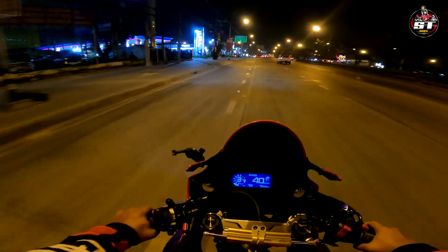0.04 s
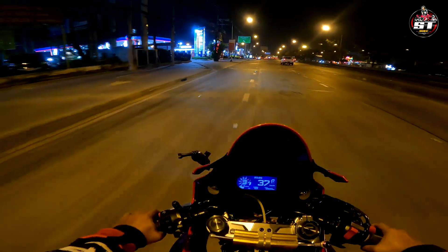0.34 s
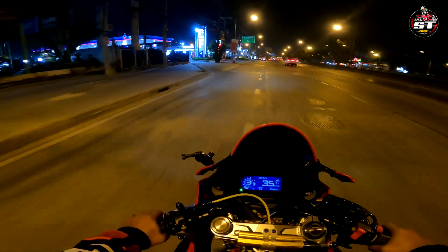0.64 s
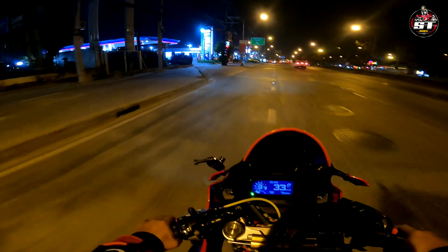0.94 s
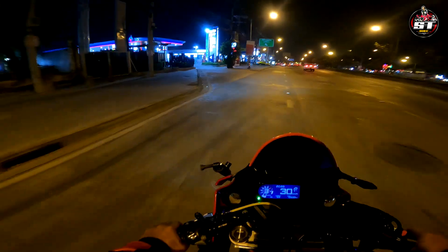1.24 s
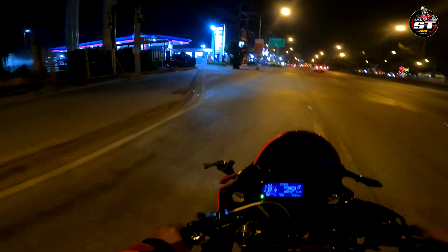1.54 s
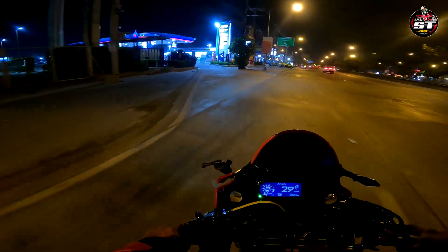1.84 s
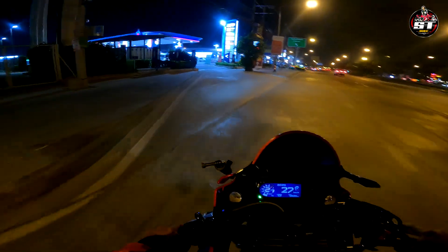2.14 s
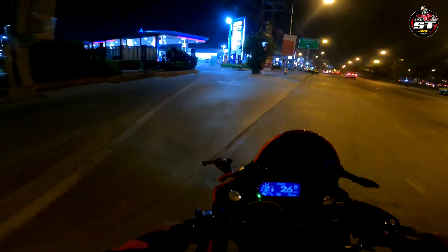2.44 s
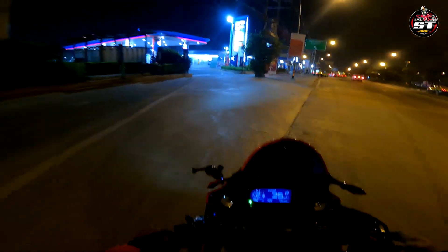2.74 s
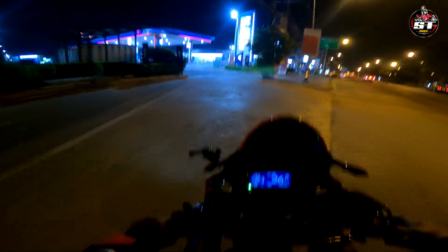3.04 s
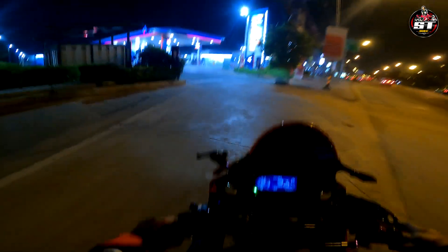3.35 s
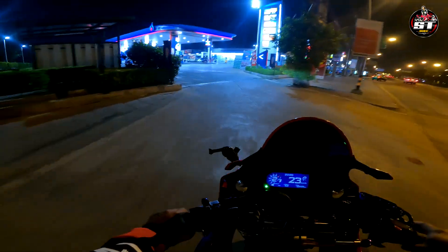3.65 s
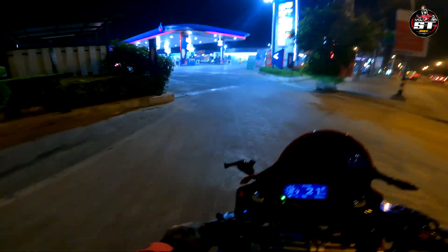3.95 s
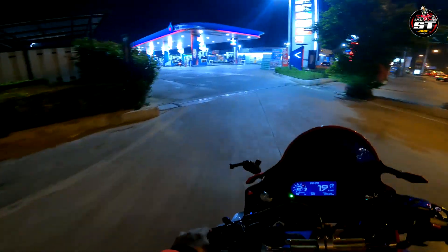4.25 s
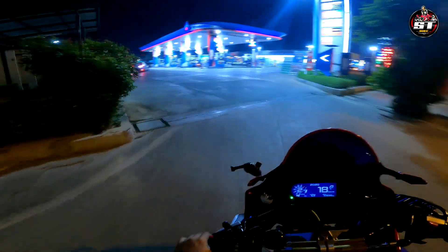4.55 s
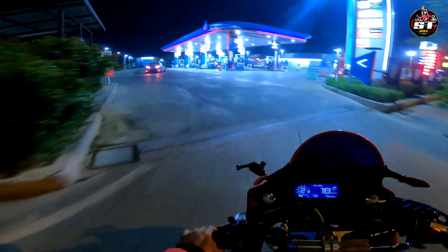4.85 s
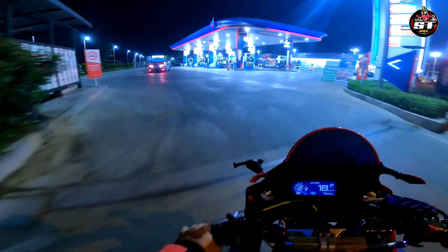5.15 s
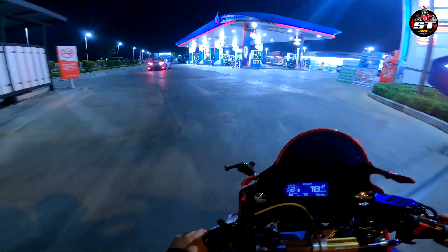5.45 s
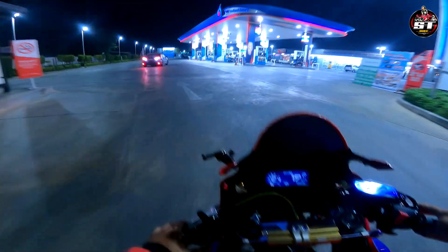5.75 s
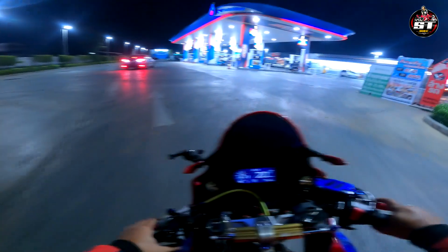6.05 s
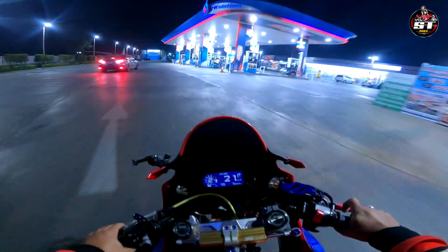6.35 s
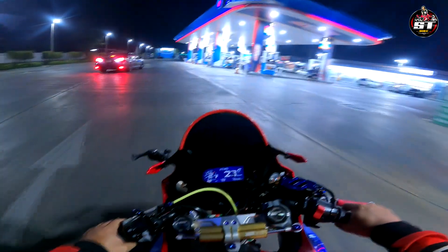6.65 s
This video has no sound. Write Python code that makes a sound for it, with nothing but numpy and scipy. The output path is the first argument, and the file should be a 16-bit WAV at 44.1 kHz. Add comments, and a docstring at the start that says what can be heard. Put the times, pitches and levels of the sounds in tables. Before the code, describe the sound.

Heard from the seat, a motorcycle coasts at low revs, downshifts, revs once briefly, idles and then rides smoothly on, with light wind buffeting.

```python
"""A night road, heard from the seat of a four-cylinder motorcycle that slows at low revs.
The exhaust burbles on a shut throttle, is blipped, sinks to idle and then pulls smoothly away.
Periodic firing gives harmonics that swell and fade as the revs carry them through the pipe's resonances;
uneven combustion gives the burble. Valve gear rustles, gears whine, tyres roll and air buffets and hisses.
A loose part buzzes, the brakes sing faintly, the downshift knocks, a sleeve swishes and something ticks."""
import sys
import numpy as np
from scipy import signal
from scipy.fft import rfft, irfft, next_fast_len
from scipy.io import wavfile
from scipy.ndimage import uniform_filter1d, map_coordinates

SR = 44100
rng = np.random.default_rng(int(sys.argv[2]) if len(sys.argv) > 2 else 0)


def generate_wav(sig):
    """Save sig (samples, or channels by samples) to the path in sys.argv[1] as 16-bit PCM at SR."""
    pcm = np.round(np.clip(np.atleast_2d(sig).T, -1, 1) * 32767).astype(np.int16)
    wavfile.write(sys.argv[1], SR, pcm)


N = 303849
TIME = np.arange(N) / SR
SILENCER_HZ = 450
CRUISE_KMH, CRUISE_HZ = 24, 60   # reference road speed and firing rate for the noise levels

# Modes of the gas in the exhaust pipe. Each row: frequency in Hz, bandwidth in Hz, gain in dB.
PIPE_MODES = [(62.7, 17.6, 3), (129.8, 11.2, -1), (154.6, 22.3, -0.5), (236.9, 21, -5.5),
              (273.3, 19.5, -4.5), (382.3, 39.7, -12.5), (420.4, 21.5, -11)]


def from_db(db):
    """Amplitude ratio: tenfold for every 20 dB."""
    return 10 ** (np.asarray(db) / 20)


def unit_rms(x):
    """Normalisation to a mean power of 1."""
    return x / np.sqrt(np.mean(x ** 2) + 1e-20)


def levelled(x, span_s):
    """Division by the running rms evens out changes slower than the span."""
    return x / np.sqrt(np.abs(uniform_filter1d(x ** 2, max(int(span_s * SR), 2))) + 1e-14)


def curves(rows):
    """Linear interpolation of each column over the times in the first."""
    times, *columns = np.transpose(rows)
    return [np.interp(TIME, times, column) for column in columns]


def butterworth(x, hz, kind, order=2):
    """A maximally flat filter, falling 6 dB per octave for each order."""
    return signal.sosfilt(signal.butter(order, hz, kind, fs=SR, output="sos"), x + 1e-18)


def drift(rate_hz):
    """Slow random modulation of rms 1: a spline through Gaussian values."""
    knots = rng.standard_normal(1400)
    smooth = map_coordinates(knots, [TIME[::50] * rate_hz + 5], order=3, mode="wrap")
    return unit_rms(smooth).repeat(50)[:N]


def noise(spectrum):
    """White noise shaped by (Hz, dB) points, rolling off beyond them; rms 1."""
    hz, db = np.transpose(spectrum)
    size = next_fast_len(N)
    log_hz = np.log(np.arange(size // 2 + 1) * SR / size + 1)
    outside = np.abs(log_hz - np.clip(log_hz, np.log(hz[0]), np.log(hz[-1])))
    gain = from_db(np.interp(log_hz, np.log(hz), db) - 13 * outside)
    return unit_rms(irfft(rfft(rng.standard_normal(size)) * gain, size)[:N])


def flutter(cycles, width_hz):
    """Random modulation of amplitude and phase spreads a tone over a narrow band; rms 1."""
    in_phase, quadrature = butterworth(rng.standard_normal((2, N)), width_hz / 2, "low")
    return unit_rms(in_phase * np.cos(2 * np.pi * cycles) + quadrature * np.sin(2 * np.pi * cycles))


def resonate(x, modes):
    """Modal superposition: damped resonators in parallel, alternating in sign."""
    out = 0
    for k, (hz, width_hz, db) in enumerate(modes):
        radius = np.exp(-np.pi * width_hz / SR)
        poles = [1, -2 * radius * np.cos(2 * np.pi * hz / SR), radius ** 2]
        mode = (1 - radius ** 2) / 2 * signal.lfilter([1, 0, -1], poles, x + 1e-18)
        out = out + (-1) ** k * from_db(db) * mode
    return out


def decay(start, t60):
    """Exponential damping from a sudden onset: 60 dB in t60 seconds."""
    return (TIME >= start) * from_db(-60 * np.maximum(TIME - start, 0) / t60)


def swell(centre_s, width_s):
    """A Gaussian envelope of height 1."""
    return np.exp(-.5 * ((TIME - centre_s) / width_s) ** 2)


def arch(start, end):
    """A rounded envelope between two times: the root of a half sine."""
    return np.sqrt(np.abs(np.sin(np.pi * np.clip((TIME - start) / (end - start), 0, 1))))


def throttle():
    """A blip raises revs, load and bark and smooths combustion; the revs sag after the throttle shuts."""
    # Engine speed between blips. Each row: time in seconds, firing rate in Hz.
    engine_speed = [(0, 93.5), (.6, 84), (1.35, 72.7), (1.6, 60.9), (1.72, 52), (2.03, 79.5), (2.45, 78.5),
                    (2.6, 68), (3.04, 57.6), (3.21, 41.2), (3.6, 43.4), (3.82, 42), (4.1, 56.2),
                    (5.25, 55.6), (5.6, 57.2), (5.88, 62.4), (6.05, 62.2), (6.33, 65), (6.89, 74.6)]
    # Combustion. Each row: time in seconds, load, roughness (both limited to 0-1 below).
    combustion = [(0, 0, 1.05), (1.55, 0.06, 0.78), (2.3, 0.12, 0.99), (3.1, 0.2, 0.94), (3.25, 0.92, 0.95),
                  (3.85, 0.73, 0.96), (4.2, 0.2, 0.75), (4.45, 0.72, 0.6), (5.55, 0.74, 0.41),
                  (5.8, 0.84, 0.52), (6.45, 1, 0.3), (6.89, 0.58, 0.38)]
    # Throttle blips. Each row: start in seconds, firing rate gained in Hz, bark gained in dB.
    blips = [(2.594, 27, 10.5), (4.672, 7, .5)]
    rise_s, close_s, sag_hz_per_s = .09, .034, 105
    firing_hz, = curves(engine_speed)
    load, roughness = curves(combustion)
    blip_db = 0
    for start, gained_hz, bark_db in blips:
        top = start + rise_s
        settled = top + gained_hz / sag_hz_per_s
        opening = np.interp(TIME, [start, top, top + close_s], [0, 1, 0])
        firing_hz = firing_hz + np.interp(TIME, [start, top, settled], [0, gained_hz, 0])
        load = load + 0.41 * opening
        roughness = roughness * (1 - 0.15 * opening)
        blip_db = blip_db + bark_db * np.sqrt(opening)
    return firing_hz, np.clip(load, 0, 1), np.clip(roughness, 0, 1), blip_db


def pipe_response(hz):
    """The pipe's complex gain for a steady tone is the sum of its modal responses."""
    return sum((-1) ** k * from_db(db) / (1 + 1j * (hz ** 2 - centre ** 2) / (hz * width))
               for k, (centre, width, db) in enumerate(PIPE_MODES))


def steady_firing(cycles, firing_hz, load):
    """Periodic firing gives a harmonic series: four partials boom, the pipe colours seven above them."""
    # Strength of a low harmonic. Each row: frequency in Hz, coasting level in dB, pulling level in dB.
    boom_spectrum = [(41, -21.5, -30.5), (50, -14, -24.5), (58.4, -16, -9.5), (59, -12.5, -13),
                     (78.3, -17, -18), (80.7, -19, -21.5), (101, -17, -24.5), (108, -24, -35.5),
                     (105, -19.5, -23.5), (121.6, -38, -23), (132.5, -24.5, -18.5), (159, -22, -10),
                     (164.2, -19.5, -24), (181.3, -27, -32), (215, -43, -21.5), (264, -35, -27),
                     (292, -35, -20.5)]
    # Emphasis at idle. Each entry: lift in dB, for harmonics 1 to 4.
    idle_lift_db = [0.5, 0.5, 1, 6]
    idle_hz, idle_span_hz = 43.4, 9.8
    drone_harmonic, drone_hz, drone_width_hz = 10, 500, 50   # a resonance that sounds past the silencer
    boom_hz, *boom_levels = np.transpose(boom_spectrum)
    idling = np.clip(1 - (firing_hz - idle_hz) / idle_span_hz, 0, 1)
    boom, overtones = 0, 0
    for k in range(1, 12):
        hz = k * firing_hz[::64]
        muffled = pipe_response(hz) / np.sqrt(1 + (hz / SILENCER_HZ) ** 40)
        drone = (k == drone_harmonic) * from_db(-20) / (1 + (2 * (hz - drone_hz) / drone_width_hz) ** 2)
        response = (muffled + drone).repeat(64)[:N]
        tone = np.sqrt(2) * np.cos(2 * np.pi * k * cycles + np.angle(response))
        if k <= len(idle_lift_db):
            coast_db, pull_db = (np.interp(k * firing_hz, boom_hz, db) for db in boom_levels)
            level_db = coast_db + load * (pull_db - coast_db) + idling * idle_lift_db[k - 1]
            boom = boom + from_db(level_db) * tone
        else:
            overtones = overtones + np.abs(response) * from_db(2.6 * drift(14)) * tone
    return boom, levelled(overtones, span_s=0.22)


def uneven_firing(cycles):
    """Charges vary in strength and timing; their impulses and turbulent puffs excite the pipe's modes."""
    # Imbalance of the four cylinders. Each entry: relative departure from the mean firing strength.
    imbalance = [.5, -0.46, -0.067, 0.036]
    jitter_s = 0.00092
    firings = np.flatnonzero(np.diff(np.floor(cycles)) > 0)
    strength, lateness, pop_size = rng.standard_normal((len(firings), 3)).T
    onsets = np.clip(firings + (jitter_s * SR * lateness).astype(int), 0, N - 1)
    surplus, pops = np.zeros((2, N))
    surplus[onsets] = np.tanh(strength) + 0.85 * np.resize(imbalance, len(firings))
    pops[onsets] = from_db(5.1 * np.clip(pop_size, -2, 2))
    puffs = rng.standard_normal(N) * (1 + 0.82 * np.cos(2 * np.pi * (cycles - .1)))
    burble = resonate(unit_rms(surplus) + .25 * puffs, PIPE_MODES)
    burble = butterworth(burble, 241.4, "low", order=6)
    burble = butterworth(burble, 44, "high", order=4)
    rasp = resonate(unit_rms(pops) + 1.17 * puffs, PIPE_MODES)
    rasp = butterworth(rasp, 248, "high", order=4)
    rasp = butterworth(rasp, SILENCER_HZ, "low", order=12)
    return levelled(burble, span_s=0.11), levelled(rasp, span_s=0.11)


def exhaust(cycles, firing_hz, load, roughness, blip_db):
    """Pulsating outflow radiates a boom, a burble and a bark; rough firing turns the bark to noise."""
    boom, overtones = steady_firing(cycles, firing_hz, load)
    burble, rasp = uneven_firing(cycles)
    # The gas leaves in one gust per firing, deeper under load.
    gust = 1 + (0.22 + 0.18 * load) * np.cos(2 * np.pi * (cycles - 0.34))
    blend = np.sqrt(1 - roughness ** 2) * overtones + roughness * rasp
    bark = levelled(blend * gust, span_s=0.14)
    stumble_db = -11.5 * swell(3.14, width_s=0.041)   # the firing falters just before idle catches
    revs_db = 5.5 * np.log2(firing_hz / CRUISE_HZ)
    burble_db = -29 + revs_db + 11.2 * roughness + 0.77 * stumble_db
    bark_db = -29.5 + revs_db + 1.6 * load + blip_db
    return from_db(0.26 + stumble_db) * boom + from_db(burble_db) * burble + from_db(bark_db) * bark


def running_gain(firing_hz, cruise_db, speed_db, revs_db, brake_db):
    """Power laws add speed_db and revs_db per doubling of road speed and revs; braking adds brake_db."""
    # Road speed. Each row: time in seconds, speed in km/h.
    road_speed = [(0, 35), (1.1, 37.5), (2.5, 29.6), (3.5, 17.6), (4.5, 17.7), (5.6, 24), (6.89, 23.3)]
    brake_on_s, brake_off_s, squeeze_s = 1.23, 3.2, 0.65
    kmh, = curves(road_speed)
    braking = np.clip(np.minimum(TIME - brake_on_s, brake_off_s - TIME) / squeeze_s, 0, 1)
    motion_db = speed_db * np.log2(kmh / CRUISE_KMH) + revs_db * np.log2(firing_hz / CRUISE_HZ)
    return from_db(cruise_db + motion_db + brake_db * braking)


def valve_rustle(cycles):
    """Valve gear and chain make broadband noise, amplitude-modulated at the firing rate."""
    # Mechanical noise. Each row: frequency in Hz, relative spectral density in dB.
    spectrum = [(1100, -11.5), (1400, -2.5), (1700, 2), (2100, -1.5), (2550, -5), (3000, -13.5),
                (3500, -11), (4200, -12.5), (4900, -15.5), (5800, -28)]
    throb = 1 + 0.11 * np.cos(2 * np.pi * (cycles - .2))
    return unit_rms(noise(spectrum) * throb * from_db(0.99 * drift(35)))


def valve_clatter(cycles):
    """Impact excitation: valves seat twice per firing, and each burst of noise rings the casing."""
    # Modes of the engine casing. Each row: frequency in Hz, bandwidth in Hz, relative gain in dB.
    casing_modes = [(1020, 440, -6.5), (1660, 260, 1), (1778, 92, 4.5), (3365, 62, -4.5), (3615, 71, -4),
                    (4900, 250, -27.5)]
    burst_s = 0.006
    seatings = np.flatnonzero(np.diff(np.floor(2 * cycles)) > 0)
    impacts = np.zeros(N)
    impacts[seatings] = from_db(6 * np.minimum(rng.standard_normal(len(seatings)), 1.5))
    envelope = signal.lfilter([1], [1, -np.exp(-1 / (burst_s * SR))], impacts + 1e-18)
    return levelled(resonate(envelope * rng.standard_normal(N), casing_modes), span_s=0.54)


def gear_whine(cycles, load):
    """Meshing teeth sound at fixed multiples of the firing rate, with levels set by the load."""
    # Gear tones. Each row: multiple of the firing rate, bandwidth in Hz, then coasting and
    # pulling levels in dB relative to the mechanical noise.
    mesh_tones = [(10.98, 190, -13, -2.5), (21.08, 220, -6, -15), (25.3, 70, -10.5, -13),
                  (36.36, 190, -19.5, -11), (41.96, 83, -17.5, -11), (62.8, 170, -31, -11.5)]
    whine = sum(from_db(coast_db + load * (pull_db - coast_db)) * flutter(multiple * cycles, width_hz)
                for multiple, width_hz, coast_db, pull_db in mesh_tones)
    high_gear = from_db(1) * arch(0.22, 1.7) * flutter(11.3 * cycles, width_hz=180)
    return whine + high_gear   # the higher gear sings only until the downshift


def machinery(cycles, firing_hz, load):
    """Structure-borne sound of valves and gears grows with road speed, revs and braking."""
    rustle = from_db(-1) * valve_rustle(cycles)
    clatter = valve_clatter(cycles)
    mechanical_gain = running_gain(firing_hz, cruise_db=-48, speed_db=4.5, revs_db=1.5, brake_db=0.5)
    clatter_gain = running_gain(firing_hz, cruise_db=-54.5, speed_db=2.5, revs_db=2.5, brake_db=3.5)
    return mechanical_gain * (rustle + gear_whine(cycles, load)) + clatter_gain * clatter


def tyres(firing_hz):
    """Rolling contact makes a low, wavering noise that grows with road speed."""
    # Rolling noise. Each row: frequency in Hz, relative spectral density in dB.
    spectrum = [(300, 7), (500, 2), (650, -1), (820, -7.5), (1000, -6.5), (1250, -11.5), (1600, -21.5)]
    gain = running_gain(firing_hz, cruise_db=-37.5, speed_db=4, revs_db=-0.1, brake_db=1)
    return gain * from_db(1.5 * drift(25)) * noise(spectrum)


def air_hiss(firing_hz):
    """Air noise in the treble flickers under random amplitude modulation."""
    # Hiss. Each row: frequency in Hz, relative spectral density in dB.
    spectrum = [(4500, 0.5), (5500, -0.5), (6600, 1.5), (7800, -2.5), (9500, -6.5), (11000, -9.5),
                (13000, -23), (15500, -25)]
    gain = running_gain(firing_hz, cruise_db=-63, speed_db=2.5, revs_db=4, brake_db=3)
    return gain * from_db(0.83 * drift(66)) * noise(spectrum)


def air_buffet():
    """Turbulent air buffets the listener with slow fluctuations of pressure."""
    # Strength of the buffeting. Each row: time in seconds, level in dB.
    strength = [(0, -18.5), (1.5, -25.5), (2.85, -34), (3.1, -26), (3.45, -20), (3.7, -26), (5.8, -36),
                (6.5, -46.5)]
    level_db, = curves(strength)
    return from_db(level_db) * noise([(5, -4.5), (11, -7), (22, -10), (45, -17.5), (120, -31)])


def rattle():
    """A loose part vibrates in a narrow band, buzzing for a while as the machine slows."""
    buzz_hz = 1030
    return from_db(-48.5) * arch(1, 5) * flutter(buzz_hz * TIME, width_hz=190.5)


def brakes():
    """Friction-excited vibration of the pads: each faint squeak swells and fades as its pitch slides."""
    # Squeaks. Each row: start and end in seconds, first and last frequency in Hz, level in dB.
    squeaks = [(1.3, 1.72, 6500, 6700, -64), (1.72, 1.925, 4900, 4950, -60), (1.88, 2.291, 4750, 4500, -62),
               (2.1, 2.553, 6220, 6760, -69), (2.25, 2.698, 7500, 7850, -66)]
    out = 0
    for start, end, from_hz, to_hz, db in squeaks:
        hz = np.interp(TIME, [start, end], [from_hz, to_hz])
        out = out + from_db(db) * arch(start, end) * flutter(np.cumsum(hz) / SR, width_hz=220)
    return out


def knocks():
    """Impacts of the downshift and small jolts give noise bursts and set loose metal ringing freely."""
    # Impacts. Each row: start in seconds, relative level in dB, 60 dB decay time in seconds.
    impacts = [(1.494, -41, .05), (1.565, -24.5, .05), (1.570, -29, .06), (1.711, -25.5, .06),
               (1.719, -32, .11), (4.755, -41, .06)]
    # Impact noise. Each row: frequency in Hz, relative spectral density in dB.
    spectrum = [(300, 1), (600, 5), (1100, -10), (1800, -10), (2900, -22), (4100, -15), (5500, -27),
                (9000, -39), (12000, -56), (15000, -72)]
    # Loose metal. Each row: start in seconds, frequency in Hz, level in dB, 60 dB decay time in seconds.
    metal_modes = [(1.722, 5000, -57, .15), (2.124, 1020, -27, 0.087), (2.921, 1050, -27, 0.021)]
    envelope = sum(from_db(db) * (0.72 * decay(start, t60) + decay(start, t60 / 5))
                   for start, db, t60 in impacts)
    ringing = sum(from_db(db) * decay(start, t60) * np.sin(2 * np.pi * hz * (TIME - start))
                  for start, hz, db, t60 in metal_modes)
    return envelope * noise(spectrum) + ringing


def rider():
    """Envelope sets character: bright noise swells as a sleeve's swish, or starts abruptly as a tick."""
    # Airy noise. Each row: frequency in Hz, relative spectral density in dB.
    spectrum = [(3000, -5), (5800, -8), (7000, -9), (8300, -4.5), (11500, -13), (13500, -23), (15500, -28)]
    swish = from_db(-51) * swell(3.452, width_s=.036)
    tick = from_db(-46) * decay(5.887, t60=.018)
    return (swish + tick) * noise(spectrum)


def scene():
    """The sources add by superposition; one firing phase times the exhaust, valves and gears."""
    firing_hz, load, roughness, blip_db = throttle()
    cycles = np.cumsum(firing_hz * (1 + 0.00403 * drift(20))) / SR   # one cycle per firing
    engine = exhaust(cycles, firing_hz, load, roughness, blip_db) + machinery(cycles, firing_hz, load)
    road_and_air = tyres(firing_hz) + air_hiss(firing_hz) + air_buffet()
    return (engine + road_and_air + brakes() + rattle() + knocks() + rider())[None]


def record(dry):
    """Band limiting: a steep elliptic low-pass follows a brief fade-in."""
    fade_s, cutoff_hz = .004, 15700
    low_pass = signal.ellip(10, .1, 80, cutoff_hz, fs=SR, output="sos")
    return signal.sosfilt(low_pass, dry * np.minimum(TIME / fade_s, 1))


dry = scene()
out = record(dry)
generate_wav(out)
```